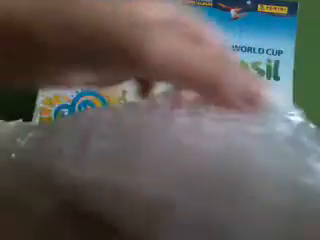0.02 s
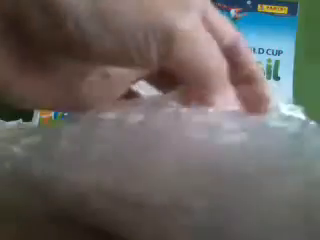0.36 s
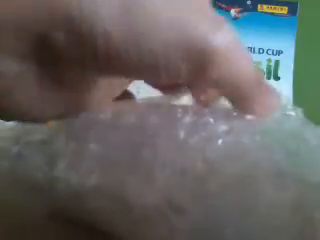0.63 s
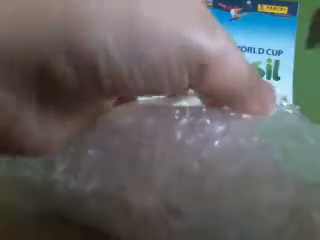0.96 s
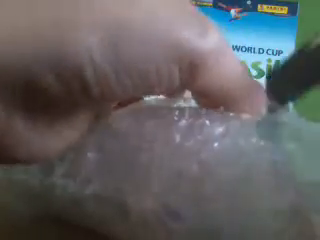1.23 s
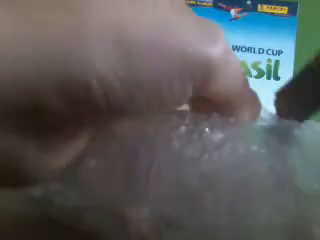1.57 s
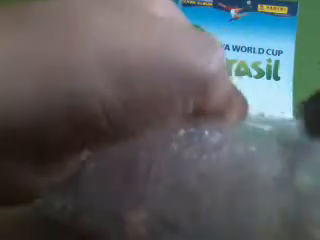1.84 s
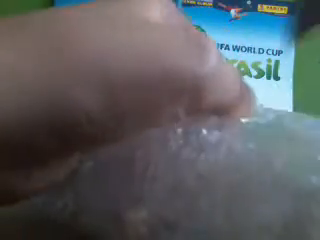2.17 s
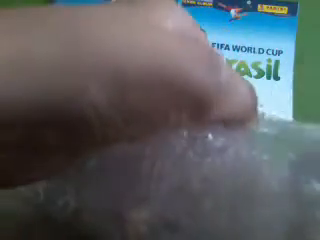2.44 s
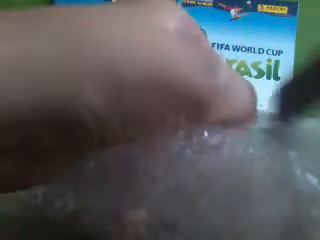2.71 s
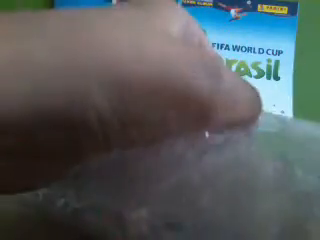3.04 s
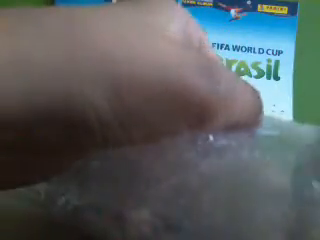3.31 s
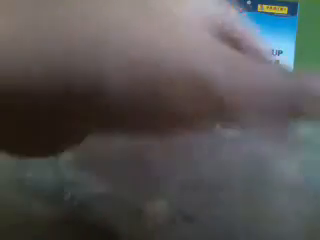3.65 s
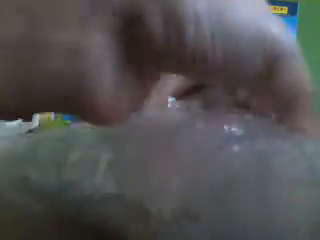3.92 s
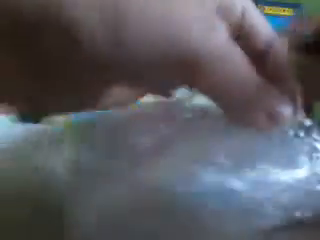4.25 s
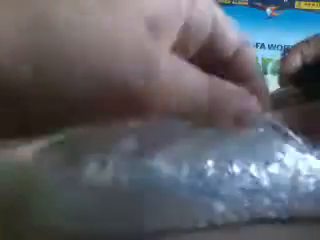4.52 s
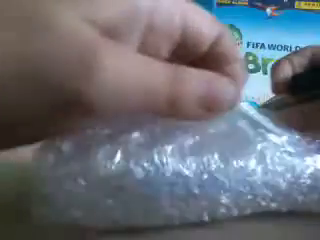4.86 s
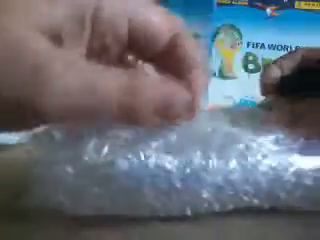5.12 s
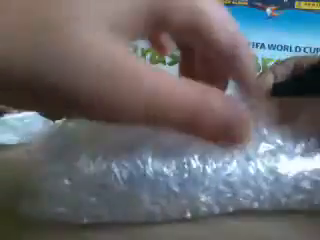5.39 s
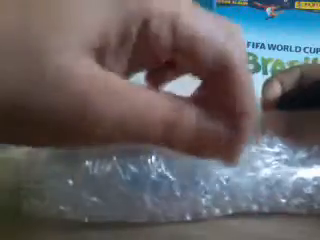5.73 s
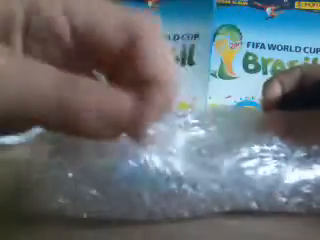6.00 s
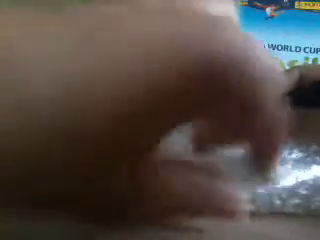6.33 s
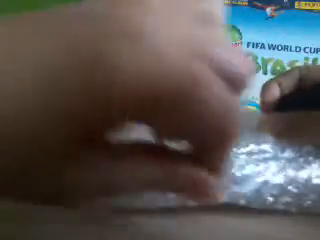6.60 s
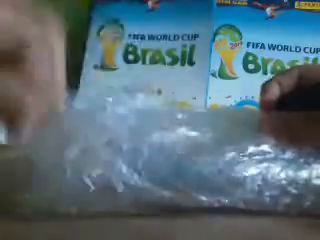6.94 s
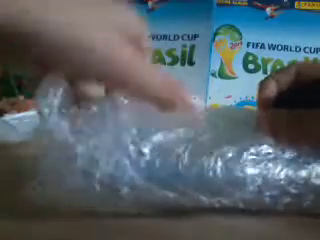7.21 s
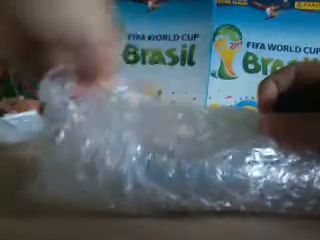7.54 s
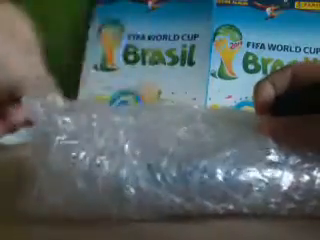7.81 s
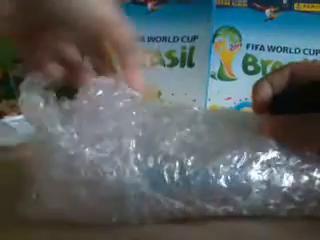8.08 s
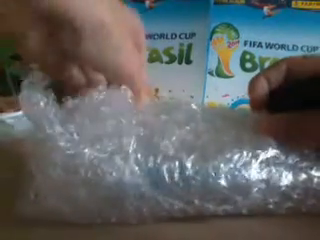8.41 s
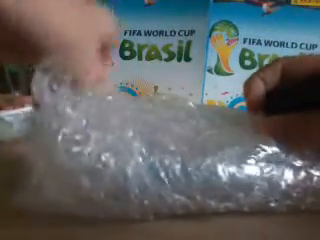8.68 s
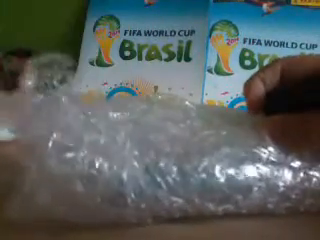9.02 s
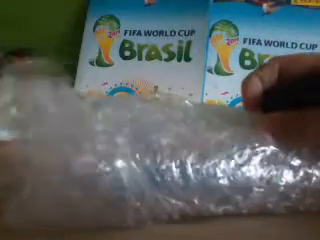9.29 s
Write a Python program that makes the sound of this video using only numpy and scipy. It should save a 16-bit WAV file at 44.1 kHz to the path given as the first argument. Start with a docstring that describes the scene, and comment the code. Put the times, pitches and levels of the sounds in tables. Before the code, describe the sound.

Close bubble wrap crackles and pops in a small room, squeaks and rips once, then crinkles more busily as it is pulled open.

```python
"""At a table in a small room, hands cut and pull open a bubble-wrapped parcel next to a microphone. The plastic
film crackles as tiny creases give way, and it rips once. Bigger creases snap, cracking the film and popping the
air cells. The parcel knocks and drags on the table and gives one loud rising squeak. The room rings briefly and
hisses faintly. The small microphone loses the lowest and highest sounds, and overloads on the loudest ones."""
import sys
import numpy as np
from scipy import signal
from scipy.fft import rfft, irfft
from scipy.io import wavfile
from scipy.ndimage import map_coordinates

SR = 44100
rng = np.random.default_rng(int(sys.argv[2]) if len(sys.argv) > 2 else 0)


def dump(signal):
    """Clip the signal to [-1, 1] and save it as 16-bit WAV at the path in sys.argv[1]."""
    limited = np.clip(np.atleast_2d(signal).T, -1, 1)
    pcm = np.round(limited * 32767).astype(np.int16)
    wavfile.write(sys.argv[1], SR, pcm)


N = 421143
TIME = np.arange(N) / SR

# the bright tone of creasing film: pitch_hz, level_db
FILM_TONE = [(100, -73), (700, -39), (2000, -21.5), (2700, -20.5), (3350, -15), (4030, 2), (4600, -5.5),
             (5300, -3.5), (6100, -5), (6850, 0), (7200, -11), (7800, -42.5), (9000, -42), (10000, -83)]
# the low tone of the parcel rubbing on the table: pitch_hz, level_db
RUB_TONE = [(120, -29), (300, -14.5), (520, -5), (660, 6), (850, -10), (1200, -1), (2200, -64)]


def gain_of(db):
    """Turns decibels into a number to multiply a sound by."""
    return 10 ** (np.asarray(db) / 20)


def evened(x):
    """Scales a sound to an average (rms) level of 1."""
    return x / np.sqrt(np.mean(x ** 2) + 1e-20)


def fade(t, ring_s):
    """Dies away by 60 dB in ring_s seconds."""
    return np.exp(-np.log(1000) * t / ring_s)


def read(points, hz):
    """Looks up a table at any pitch, spacing the octaves evenly."""
    pitches, values = np.transpose(points)
    return np.interp(np.log(hz + 1), np.log(pitches + 1), values)


def add(mix, start_s, sound):
    """Mixes a sound in at the given time."""
    part = mix[max(round(start_s * SR), 0):][:len(sound)]
    part += sound[:len(part)]


def swells(rows):
    """A loudness curve that rises, holds and falls once for each row."""
    loudness = np.zeros(N)
    for start_s, length_s, level_db in rows:
        add(loudness, start_s, gain_of(level_db) * signal.windows.tukey(round(length_s * SR), .6))
    return loudness


def noise(tone):
    """Steady noise with the given tone."""
    gains = gain_of(read(tone, np.fft.rfftfreq(N, 1 / SR)))
    return evened(irfft(rfft(rng.standard_normal(N)) * gains, N))


def click(tone, ripple_db, ripple_hz, size=1024):
    """One click; each spot of the wrap rings at its own chance pitches."""
    hz = np.fft.rfftfreq(size, 1 / SR)
    bumps = rng.standard_normal(size)
    ripple = map_coordinates(bumps, [hz / ripple_hz + 2], order=3, mode="wrap")
    # keep the tone, but pack the energy at the start (minimum phase)
    cepstrum = irfft(np.log(gain_of(read(tone, hz) + ripple_db * ripple)))
    cepstrum[1:size // 2] *= 2
    cepstrum[size // 2 + 1:] = 0
    wave = irfft(np.exp(rfft(cepstrum)))
    return wave / np.linalg.norm(wave)


def room_hiss(level_db=-53.5):
    """The room adds a faint, steady hiss."""
    # the tone of the hiss: pitch_hz, level_db
    hiss_tone = [(60, -65), (300, 8), (700, -1), (1350, 4), (2400, 9), (4000, 34.5), (6900, -18),
                 (7900, -26), (10000, -67)]
    return gain_of(level_db) * noise(hiss_tone)


def room(x, near_db=-13, near_ring_s=0.028, tail_db=-15, size=20000):
    """Sound bounces quickly off hands and table, then rings briefly around the room."""
    # how long the room rings: pitch_hz, ring_s
    ring_times = [(300, 0.31), (1300, 0.25), (5500, 0.28)]
    t = np.arange(size) / SR
    near, tail = rng.choice([-1., 1.], (2, size)) * (rng.random((2, size)) < 4000 / SR)
    near = near * (t > .002) * fade(t, near_ring_s)
    hz, frame_s, bands = signal.stft(tail * (t > .007), SR, nperseg=256)
    bands = bands * fade(frame_s, read(ring_times, hz)[:, None])
    tail = signal.istft(bands, SR, nperseg=256)[1][:size]
    echoes = gain_of(near_db) * near / np.linalg.norm(near)
    echoes += gain_of(tail_db) * tail / np.linalg.norm(tail)
    return signal.oaconvolve(x, echoes)[:N]


def drags():
    """The parcel slides, rubbing a low tone out of itself and the table."""
    # short slides: start_s, length_s, level_db
    slides = [(0.271, 0.11, -37), (4.459, 0.14, -24.5), (4.597, 0.058, -29.5), (4.778, 0.22, -39.5),
              (7.289, 0.063, -37), (8.308, 0.048, -33), (8.436, 0.048, -37.5), (8.522, 0.061, -34),
              (8.626, 0.069, -28.5), (8.736, 0.02, -37)]
    return swells(slides) * noise(RUB_TONE)


def knocks_and_squeak(rattle_db=-21, muffled_hz=1800, size=8000):
    """The parcel knocks on the table and squeaks once; the wrap smothers the high notes."""
    # knocks, and one loud rising squeak near 4.4 s: start_s, level_db, pitch_hz, ring_s
    sounds = [(.381, -12, 657, 0.14), (0.3901, -18.5, 500.5, 0.2), (0.415, -14.5, 700, 0.13),
              (.547, -28.5, 657, 0.11), (4.3925, 12.5, 623, 0.051), (4.4275, 2, 651, 0.064),
              (4.434, 7.5, 679, 0.062), (4.4522, 3, 1312, 0.033), (4.634, -18, 698, 0.034),
              (7.2136, -8.5, 484, 0.017)]
    # the notes within each sound: pitch_multiple, level_db
    notes = [(1, 1.5), (.75, -26), (1.53, -15.5), (1.87, -7.5)]
    ringing, contact = np.zeros((2, N))
    t = np.arange(size) / SR
    for start_s, level_db, hz, ring_s in sounds:
        loudness = gain_of(level_db) * fade(t, ring_s)
        chord = sum(gain_of(db) * np.sin(2 * np.pi * hz * multiple * t)
                    for multiple, db in notes if hz * multiple < muffled_hz)
        add(ringing, start_s, loudness * chord)
        add(contact, start_s, np.tanh(loudness / 0.15))  # the rattle can only get so loud
    return ringing + gain_of(rattle_db) * contact * noise(RUB_TONE)


def handling(grip_s=0.024, arch_db=2, release_db_per_s=299.5):
    """How loudly the hands work the wrap: dB curves for the bright film and the hollow body."""
    # fingers resting and shifting: time_s, level_db, hollow_above_film_db
    touches = [(0, -33, 2), (.5, -35, 2.5), (.75, -42, -3), (1.4, -45, -6), (2.15, -35, -4.5),
               (2.45, -43.5, -7.5), (2.9, -56, 3), (3.36, -56.5, 7.5), (3.55, -38, -1), (4.05, -42, -1.5),
               (4.62, -30.5, 0.5), (5.3, -36.5, 1.5), (6.1, -28.5, -7), (6.43, -38.5, -5), (6.9, -29, -1.5),
               (7.4, -35, -2), (8.35, -37, -2), (9.55, -26.5, -5.5)]
    # squeezes and pulls: start_s, length_s, level_db, hollow_above_film_db
    squeezes = [(0, .055, -22, 0), (1.705, .13, -37, -10.5), (1.849, .09, -25.5, -9),
                (2.098, .04, -20, -3.5), (2.183, .035, -25, 2), (2.52, .075, -29.5, -2),
                (2.638, .1, -24.5, 0.5), (2.944, .03, -32, 0), (3.027, .05, -35, -1.5),
                (3.079, .125, -24, 4), (3.404, .075, -34.5, -2.5), (3.496, .035, -19, -5),
                (3.569, .09, -29, 0.5), (3.757, .15, -31, -1), (4.1, .12, -34.5, -7),
                (4.299, .16, -31, -3.5), (4.48, .06, -24, 0), (4.714, .08, -26.5, -9),
                (4.991, .11, -19, -10.5), (5.141, .07, -23.5, -3.5), (5.326, .09, -27.5, -4),
                (5.429, .05, -21.5, -2), (5.646, .11, -23, -12), (5.776, .04, -14.5, -7.5),
                (5.898, .1, -9, -11), (6.01, .17, -13.5, -12.5), (6.271, .11, -23.5, -5),
                (6.491, .21, -23, -14), (6.749, .1, -20, -9), (6.886, .08, -8, -6.5), (6.964, .1, -2, -6.5),
                (7.203, .14, -30.5, -12), (7.428, .16, -29, -2.5), (7.607, .08, -22, -3),
                (7.685, .1, -14.5, -4), (7.85, .07, -14, -6), (7.931, .09, -18, -5), (8.119, .12, -22, -4),
                (8.487, .14, -26, -4), (8.706, .06, -16, -1), (8.841, .1, -17, -3.5), (8.949, .12, -11, -4),
                (9.175, .1, -21, -0.5), (9.284, .07, -3.5, -9), (9.386, .13, -22.5, -13.5)]
    times, levels, hollowness = np.transpose(touches)
    film_power = gain_of(np.interp(TIME, times, levels)) ** 2
    hollow_power = gain_of(np.interp(TIME, times, levels + hollowness)) ** 2
    for start_s, length_s, level_db, hollow_above_db in squeezes:
        t = TIME - start_s
        grip = np.clip(t / grip_s + .5, 0, 1)
        arch = np.sin(np.pi * np.clip(t / length_s, 0, 1)) - 2 / np.pi
        let_go_db = release_db_per_s * np.clip(t - length_s, 0, 1)
        power = (grip * gain_of(level_db + arch_db * arch - let_go_db)) ** 2
        film_power += power
        hollow_power += power * gain_of(hollow_above_db) ** 2
    return 10 * np.log10(film_power), 10 * np.log10(hollow_power)


def crackle(film_db, hollow_db, creases_per_s=750, spread_db=6.5, scatter_db=1.5, spots=24):
    """Tiny creases give way, more often under harder work; a light touch mostly rubs film on film."""
    # the hollow tone of the wrap: pitch_hz, level_db
    hollow_tone = [(100, -76.5), (250, -27.5), (450, -15), (650, -9.5), (920, -11), (1220, 3.5),
                   (1430, 4.5), (1800, -13), (2400, -35), (3200, -53.5)]
    effort_db = film_db - film_db.mean()
    rate = creases_per_s * np.exp(.02 * effort_db)
    rub = gain_of(-4 - 0.13 * effort_db)
    starts = np.flatnonzero(rng.random(N) < rate / SR)
    strength_db = spread_db * np.minimum(rng.exponential(1, N), 3.17)
    strength = gain_of(strength_db[starts]) / np.sqrt(rate[starts])
    spot = rng.integers(0, spots, N)[starts]
    out = np.zeros(N)
    for tone, level_db, ripple_hz in ((FILM_TONE, film_db, 600), (hollow_tone, hollow_db, 350)):
        heights = strength * gain_of(scatter_db * rng.standard_normal(N)[starts])
        heights *= rng.choice([-1, 1], N)[starts]
        clicks = np.array([click(tone, ripple_db=6.5, ripple_hz=ripple_hz) for _ in range(spots)])
        places = starts[:, None] + np.arange(clicks.shape[1])
        creases = np.bincount(places.ravel(), (heights[:, None] * clicks[spot]).ravel(), N)[:N]
        out += gain_of(level_db - 1) * (evened(creases) + rub * noise(tone)) / np.hypot(1, rub)
    return out


def rip(slips_per_s=450, spread_db=4):
    """A tear runs through the film as a quick string of uneven slips."""
    # the tear as the parcel is pulled open: start_s, length_s, level_db
    tears = [(4.462, 0.11, -22.5)]
    # the tone of one slip: pitch_hz, level_db
    slip_tone = [(1500, -45), (2400, -12), (2750, -5), (4100, 4), (5200, -13), (7000, -17), (8000, -52)]
    slips = (rng.random(N) < slips_per_s / SR) * gain_of(spread_db * rng.standard_normal(N))
    tearing = signal.oaconvolve(slips, click(slip_tone, ripple_db=-3, ripple_hz=497))[:N]
    return swells(tears) * evened(tearing)


def film_crack(length_s, steps=5, step_db=-2.6):
    """The film gives way in a few quick steps, each weaker than the last."""
    wave = np.zeros(2048)
    for k in range(steps):
        delay_s = min(length_s, .015) * (k + rng.uniform(-.45, .45) * (k > 0)) / steps
        height = rng.choice([-1, 1]) * gain_of(step_db * k)
        add(wave, delay_s, height * click(FILM_TONE, ripple_db=0.5, ripple_hz=626))
    return wave / np.linalg.norm(wave)


def air_pop(ring_db=-10, ring_s=0.037, size=2048):
    """One push on the air cells, then the boxy ring of the parcel."""
    # the tone of a pop: pitch_hz, level_db
    pop_tone = [(100, -53), (300, -21), (600, -9), (900, -7), (1150, -0.5), (1380, 8), (1750, -14.5),
                (2400, -28.5), (3500, -50)]
    t = np.arange(size) / SR
    push = click(pop_tone, ripple_db=1.8, ripple_hz=458)
    ring = signal.fftconvolve(rng.standard_normal(size) * fade(t, ring_s), push)[:size]
    wave = gain_of(ring_db) * ring / np.linalg.norm(ring)
    add(wave, 0, rng.choice([-1, 1]) * push)
    return wave / np.linalg.norm(wave)


def chance_snaps(film_db, hollow_db, snaps_per_s=7, above_db=6, spread_db=1.5, top_db=-7.5, count=400):
    """Lists lesser creases that snap by chance, louder and more often under harder work."""
    rate = snaps_per_s * np.exp(.04 * (film_db - film_db.mean()))
    starts = np.searchsorted(np.cumsum(rate) / SR, np.cumsum(rng.exponential(1, count)))
    boosts_db = above_db + spread_db * rng.standard_normal((count, 2))
    return [(i / SR, *np.minimum(boost + (hollow_db[i], film_db[i]), top_db))
            for i, boost in zip(starts, boosts_db) if i < N]


def snaps(film_db, hollow_db, crack_s=.0032, growth_per_db=0.041):
    """A snapping crease pops the air cells and cracks the film; a louder crack runs on longer."""
    # the snaps that stand out: start_s, pop_db, crack_db
    main_snaps = [(.0458, -7, -23), (.5476, -21, -18.5), (.892, -31, -23), (.988, -13, -18),
                  (1.3092, -17, -29), (1.4103, -56.5, -29.5), (1.7139, -34.5, -17.5), (1.798, -27.5, -17.5),
                  (1.8921, -42, -16), (1.9177, -35, -11), (1.928, -18, -12.5), (1.9442, -25, -16),
                  (2.0995, -17, -22), (2.1099, -14, -11), (2.1237, 1, -12.5), (2.2065, -6, -8),
                  (2.5978, -29, -9), (2.6326, -6.5, -8.5), (2.6405, -1.5, -28), (2.6587, 4, -12),
                  (2.7374, -5, -21), (3.081, -0.5, -7), (3.0866, -2, -13), (3.1133, 0, -41),
                  (3.1466, -7, -10.5), (3.1863, -1, -6.5), (3.3984, -8, -14.5), (3.4543, -27, -22),
                  (3.472, -20, -9), (3.5007, 8.5, -6.5), (3.5186, 4, -32), (3.5819, -12.5, -12.5),
                  (3.5988, -12, -19), (3.6341, -7.5, -15), (3.6532, -3.5, -19.5), (3.7989, -5, -8.5),
                  (3.889, -19, -22), (3.979, -46, -16), (4.11, -18.5, -26), (4.1376, -23, -30),
                  (4.1818, -20, -16), (4.2046, -23.5, -15.5), (4.2875, -39, -18), (4.3058, -12, -12),
                  (4.353, -18, -11), (4.387, -11, -12.5), (4.5186, -40, -10.5), (4.5282, -37, -11.5),
                  (4.6668, -10, -6.5), (4.7157, -15.5, -1.5), (4.8585, -34, -13), (4.8828, -21.5, -6.5),
                  (4.932, -13, -4.5), (4.999, -15, -2.5), (5.0201, -5.5, 0), (5.0577, -9.5, -2),
                  (5.0851, -12, -.5), (5.111, -19, -6.5), (5.1292, -15, -4.5), (5.1661, -17, -4),
                  (5.4386, 8, -8.5), (5.4625, -7.5, -8), (5.6081, -12.5, -13.5), (5.7845, -9.5, -12.5),
                  (5.8067, -10, 2.5), (5.8924, -22, -3.5), (5.9934, -10.5, 2.5), (6.0674, -5, 1),
                  (6.089, -18, -4.5), (6.1105, -9, -3.5), (6.1429, -8, -3.5), (6.2569, -15.5, -15.5),
                  (6.2859, -15, -15.5), (6.314, -18, -9.5), (6.4813, -10, -13), (6.597, -34, -9),
                  (6.6443, -18, -23), (6.7303, -23, -9), (6.7643, -14.5, -9), (6.7918, -9, -1.5),
                  (6.8573, -9.5, -6.5), (6.8661, -2, 4.5), (6.8819, 0, -1.5), (7.1505, -21, -12),
                  (7.2142, -11.5, -6), (7.2745, -32, -19), (7.2955, -31, -17), (7.313, -34, -14),
                  (7.4224, -32, -13), (7.5012, -12.5, -32), (7.615, -5.5, -20.5), (7.7131, 4, -4.5),
                  (7.7728, -10, -2), (7.9038, -13.5, -1.5), (7.95, -12, 0), (8.0089, -6, -3),
                  (8.1233, -13.5, -9), (8.1726, -10.5, -11), (8.2209, -7.5, -5), (8.3336, -27, -12),
                  (8.3863, -38, -16.5), (8.6033, -24, -16.5), (8.6992, -11, -28), (8.7255, -5, 2.5),
                  (8.8475, -5, -7), (8.9108, -4, -4), (9.0764, -7, -15), (9.1697, -9.5, -6),
                  (9.2081, -1.5, -5), (9.2514, -2.5, -2.5), (9.502, -17.5, -7), (9.514, -20, -6.5)]
    out = np.zeros(N)
    scale = np.sqrt(.002 * SR)  # levels are averages over 2 ms
    for start_s, pop_db, crack_db in main_snaps + chance_snaps(film_db, hollow_db):
        crack = film_crack(crack_s * np.exp(growth_per_db * (crack_db + 9.5)))
        add(out, start_s, scale * (gain_of(pop_db) * air_pop() + gain_of(crack_db) * crack))
    return out


def scene(parcel_echo_db=-13, move_hz=0.691):
    """The wrap moves, so its echoes keep changing; knocks, squeak and drags echo much less."""
    film_db, hollow_db = handling()
    wrap = crackle(film_db, hollow_db) + snaps(film_db, hollow_db) + rip()
    parcel = knocks_and_squeak() + drags()
    in_air = wrap + gain_of(parcel_echo_db) * parcel
    turn = 2 * np.pi * move_hz * TIME
    echoes = room(in_air * np.cos(turn)) + room(in_air * np.sin(turn))
    return (wrap + parcel + echoes + room_hiss())[None]


def record(dry, bass_hz=180, ceiling=.72, bias=0.052):
    """The microphone drops the bass, chops off loud peaks a little lopsidedly and softens the treble."""
    thin = signal.sosfilt(signal.butter(3, bass_hz, "high", fs=SR, output="sos"), dry)
    clipped = np.clip(thin, bias - ceiling, bias + ceiling)
    pitches_hz, gains = [0, 6000, 10000, 15700, 16300, SR / 2], [1, 1, .58, .45, 0, 0]
    treble_cut = signal.firwin2(255, pitches_hz, gains, window=("kaiser", 9), fs=SR)
    return signal.oaconvolve(clipped, treble_cut[None], "same")


dry = scene()
out = record(dry)
dump(out)
```